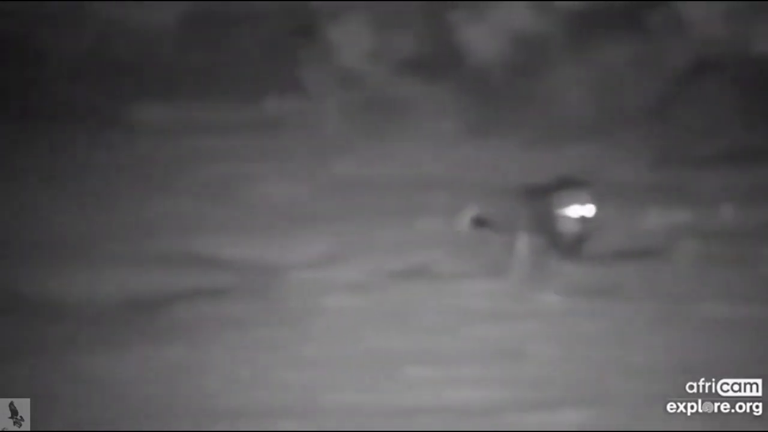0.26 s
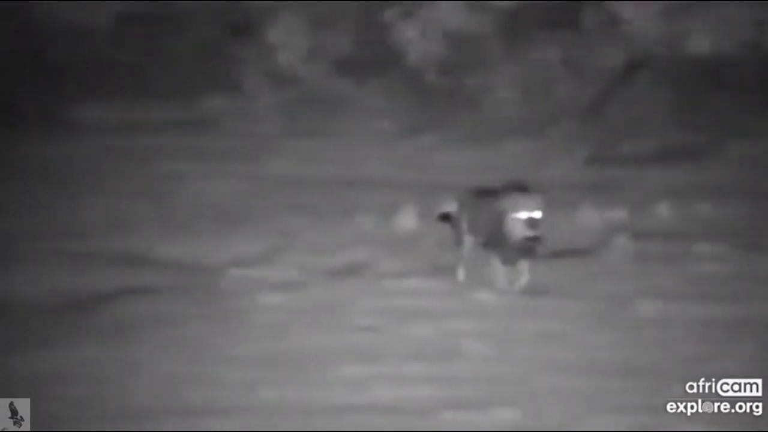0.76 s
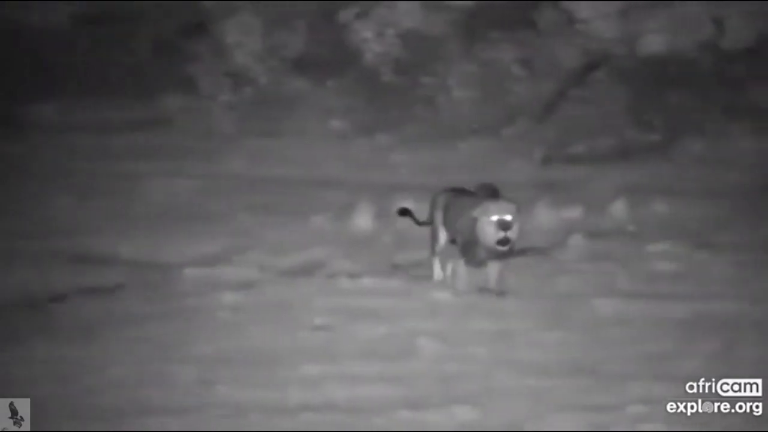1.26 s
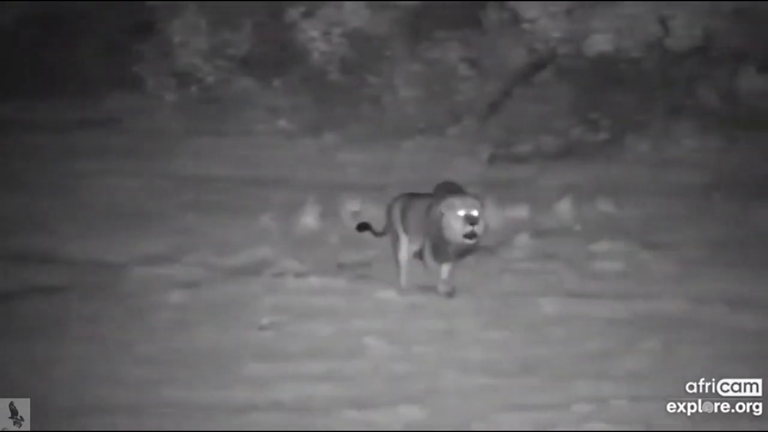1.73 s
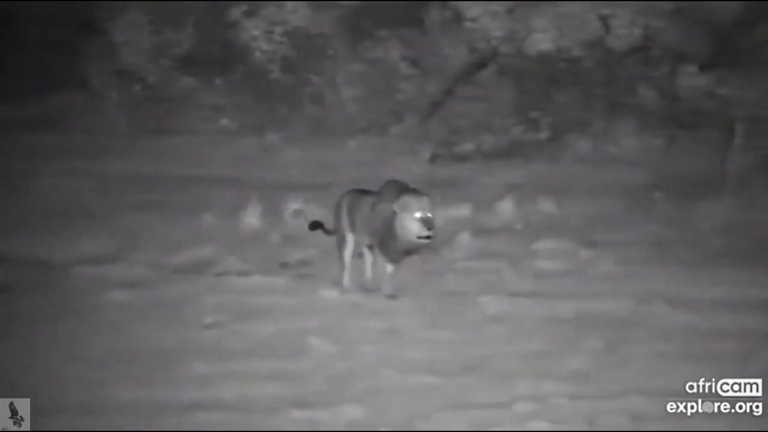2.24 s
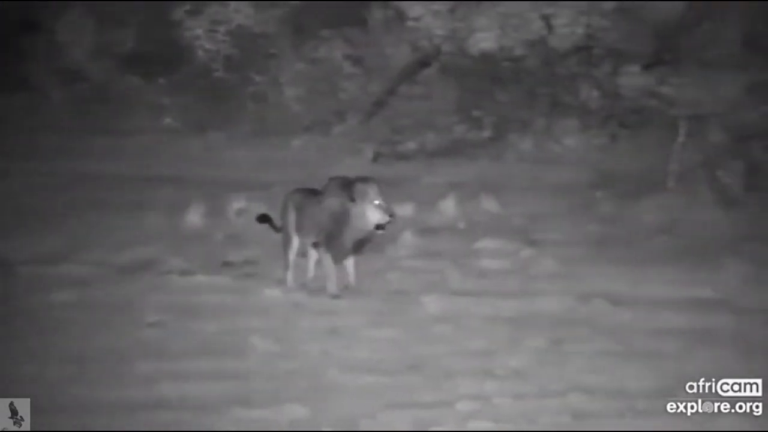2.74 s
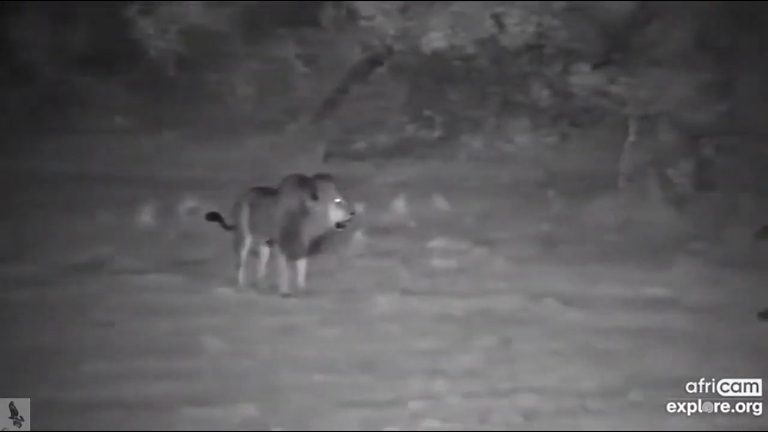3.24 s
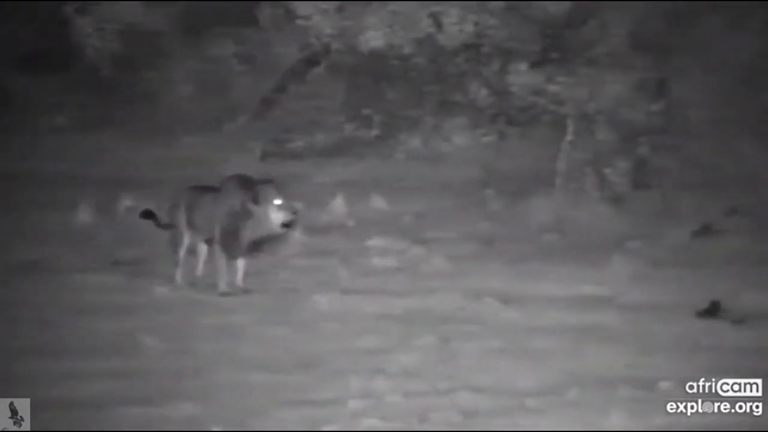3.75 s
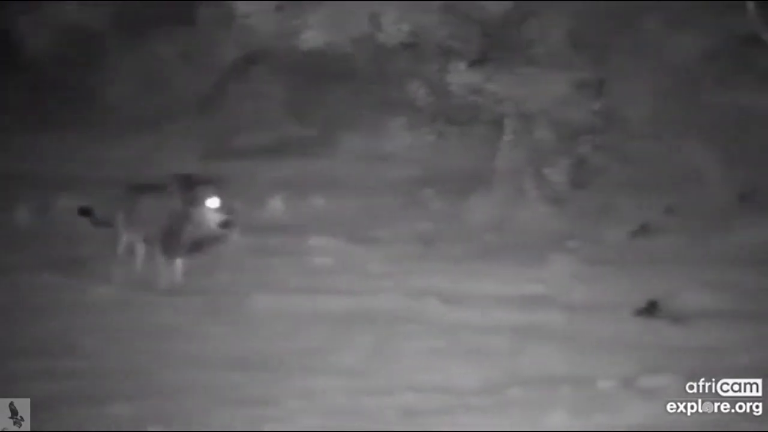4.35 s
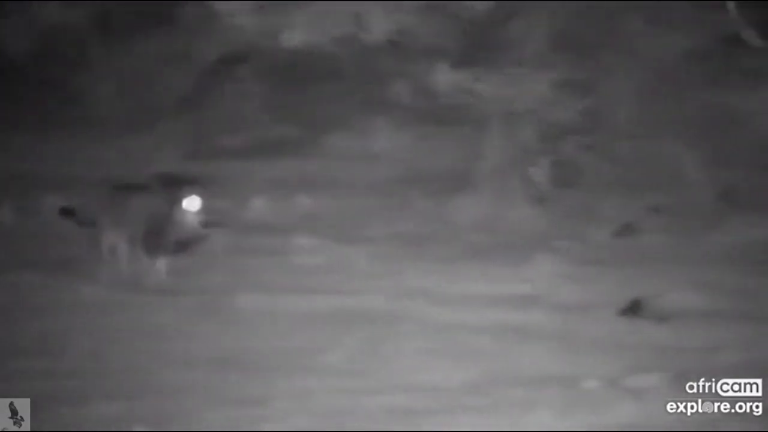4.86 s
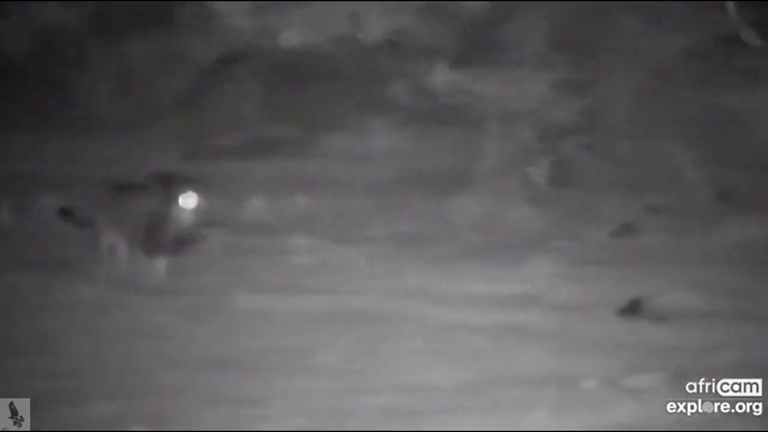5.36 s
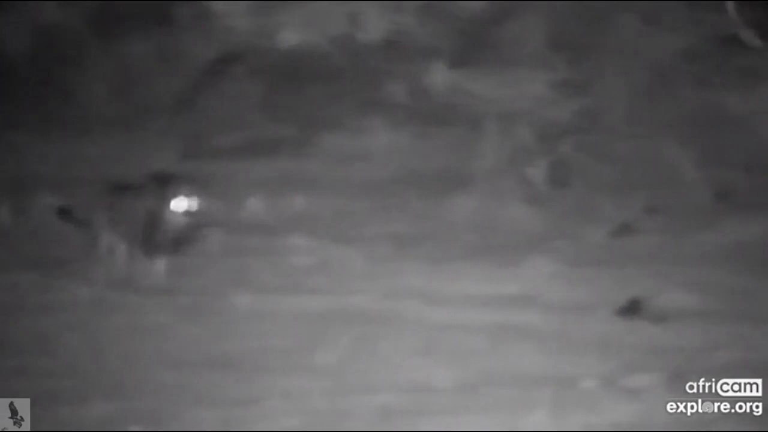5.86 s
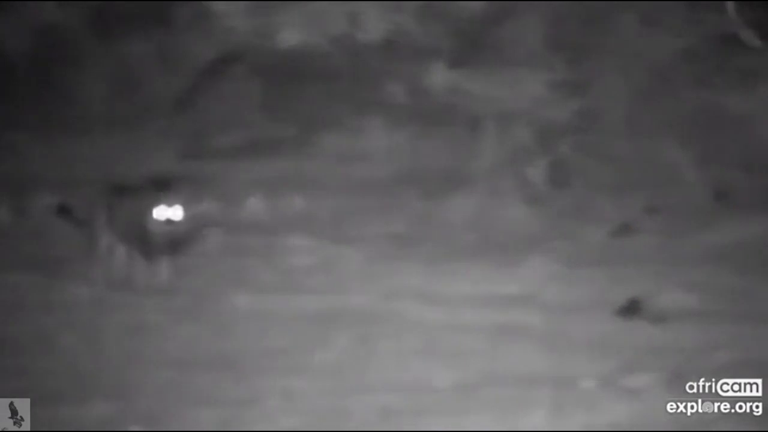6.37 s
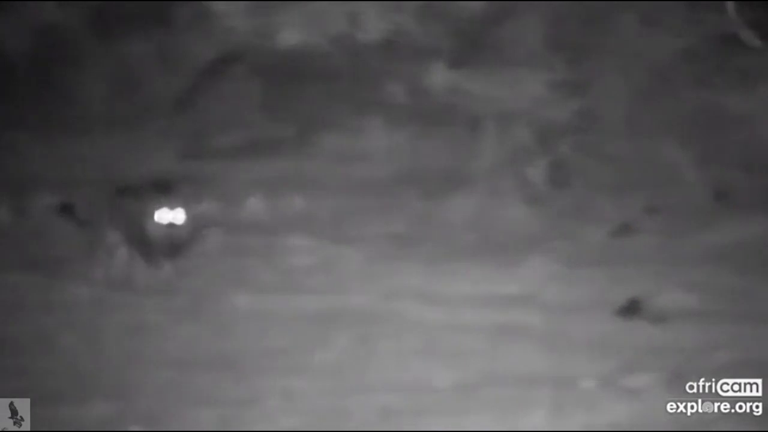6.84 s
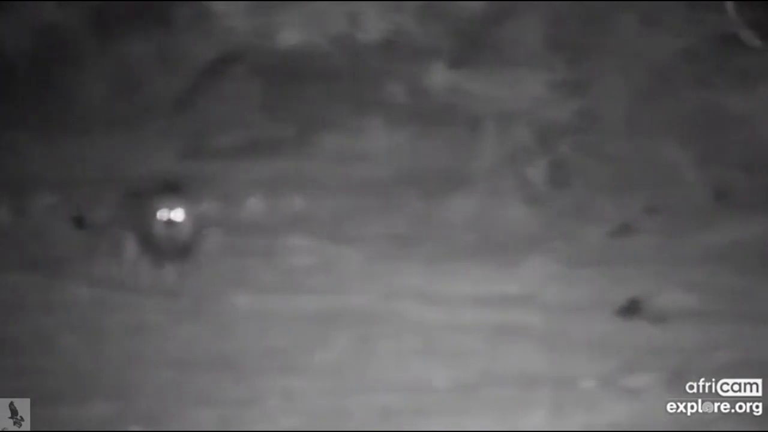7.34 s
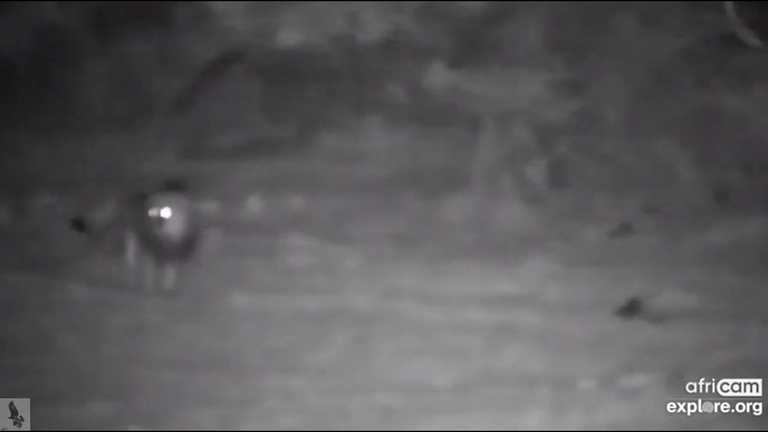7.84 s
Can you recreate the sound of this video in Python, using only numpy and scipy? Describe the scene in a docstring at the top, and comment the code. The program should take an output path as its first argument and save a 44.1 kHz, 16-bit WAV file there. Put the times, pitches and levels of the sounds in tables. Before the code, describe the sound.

A lion roars three times in open bush at night, some way from a fixed outdoor microphone. Each roar rises as a deep, clear moan, drops in pitch and crumbles into a ragged, breathy growl, then echoes off distant trees. Faint crickets chirp throughout. A small animal gives brief rising whistles around the first roar and a quick run near the end, over soft hiss and low electrical hum.

```python
"""Lion in the night bush

A lion roars three times in open bush, some way off from a fixed outdoor microphone. Each roar climbs
as a clear moan of the vocal folds, breaks to a lower pitch and crumbles into a growl of ragged pulses;
the far trees send it back. Crickets chirp, a small animal whistles now and then, and mains hum and
hiss lie under it all."""
import sys
import numpy as np
from scipy import signal
from scipy.fft import rfft, irfft
from scipy.io import wavfile
from scipy.ndimage import uniform_filter1d

SR = 44100
rng = np.random.default_rng(int(sys.argv[2]) if len(sys.argv) > 2 else 0)


def to_wav(s):
    """Save 16-bit WAV."""
    ch = np.atleast_2d(s).T  # columns
    pcm = np.round(np.clip(ch, -1, 1) * 32767)  # PCM
    wavfile.write(sys.argv[1], SR, pcm.astype(np.int16))


N = 357210

# The voice, one table a roar. Each row: time in seconds, effort in dB, pitch in Hz.
ROAR_CONTOURS = [
    [(1.28, -55.5, 119.9), (1.346, -31, 130.7), (1.468, -28, 184.9), (1.53, -22.5, 193.8),
     (1.61, -20, 194.2), (1.665, -18, 201.6), (1.825, -16.5, 213.8), (1.865, -20, 171.5),
     (1.925, -28, 161.6), (2.0, -21.5, 163.7), (2.1, -23, 165.4), (2.2, -24, 152.1), (2.4, -31.5, 140.3),
     (2.56, -50.5, 138.6)],
    [(4.02, -51, 120.6), (4.084, -33.5, 129.9), (4.182, -24, 184.1), (4.272, -21.5, 209.5),
     (4.46, -20, 215.1), (4.565, -22, 227.7), (4.62, -17.5, 208.2), (4.7, -22, 203.4), (4.73, -22.5, 163.5),
     (4.9, -24, 155.9), (4.97, -23.5, 184.9), (5.1, -28.5, 160.5), (5.17, -41.5, 161.5), (5.28, -53, 163.8)],
    [(6.53, -54, 117.6), (6.634, -29, 131.8), (6.77, -24, 165.6), (6.82, -23, 186.3), (7.02, -21, 193.9),
     (7.05, -24.5, 163.3), (7.13, -23, 158.5), (7.225, -14.5, 157.3), (7.3, -19.5, 153.1),
     (7.4, -23.5, 150), (7.54, -24, 153.4), (7.656, -35, 154.3), (7.78, -52, 149.4)],
]
# Each row, one a roar: seconds at which the moan starts, frays and breaks and the growl starts and
# is full, then roughness from 0 to 1 in the moan, once frayed and after the break.
ROAR_STAGES = [(1.48, 1.65, 1.85, 2.02, 2.11, .09, .23, .2), (4.265, 4.5, 4.575, 4.86, 5.0, .07, .1, .36),
               (6.8, 6.82, 7.06, 7.28, 7.39, .25, .28, .13)]
# Each row, one a roar: lip noise and overtone ring in dB against the effort, delay of the first rasp
# in seconds, deep throat gain in dB.
ROAR_TIMBRES = [(-19, -37, 0.11, 1.1), (-26.5, -22.5, 0.11, -0.4), (-22, -47, .17, -1.5)]
# Throbs of the voice. Each row: start in seconds, swell in dB, length in seconds.
THROBS = [(1.321, 4.5, 0.068), (2.207, 4, 0.028), (2.294, 7.5, 0.036), (2.375, 6, 0.04),
          (2.432, 9.5, 0.025), (4.046, 7.5, 0.036), (4.078, 11.5, 0.08), (5.008, 3.5, 0.02),
          (5.107, 4, 0.025), (6.56, 8.5, 0.015), (6.812, 10, 0.25), (6.632, 8.5, 0.0087), (7.434, 4, 0.029),
          (7.604, 6, 0.0062), (7.647, 0.5, 0.038), (7.723, 8.5, 0.013)]
# Throat resonances. Each row: centre in Hz, width in Hz, gain in dB.
DEEP_MODES = [(400, 120, 0), (320, 120, -8)]
MIDDLE_MODES = [(638, 95, 0)]
UPPER_MODES = [(942, 97, 3), (1112.4, 55, 1.5), (1308, 103, -1.5)]
# The moving throat, one table a roar. Each row: time in seconds, middle resonance in Hz, its gain
# in dB, lowest upper resonance in Hz, gain of the upper group in dB.
THROAT_SHAPES = [
    [(1.3, 580, -3, 840, 0.5), (1.5, 650, 4.5, 910, -6), (1.66, 637, -7.5, 934, -4),
     (1.7, 658, 9.5, 997, -6), (1.84, 634, 2.5, 980, -0.5), (1.9, 663, -8, 968, -4),
     (2.03, 640, -4, 925, 0), (2.1, 693, -14, 1013, -3.5), (2.25, 680, 2, 1033, 2.5),
     (2.45, 590, -15.5, 873, 0.5)],
    [(4.05, 586, 2.5, 903, -1.5), (4.26, 621, 2, 883, -3.5), (4.55, 638, 8, 920, 2), (4.68, 623, 5, 950, 1),
     (4.76, 586, -1, 875.2, -4.5), (4.88, 536, 12, 865, 6), (4.94, 750, 0, 985, -4.5),
     (5.05, 704, -4, 966, -2), (5.2, 620, -6, 902, -4)],
    [(6.55, 562, -14.5, 890, -7.5), (6.75, 635, 12.5, 877, 6.5), (6.85, 660, 2, 953, -2),
     (7.03, 673, 0.5, 970, -7.5), (7.25, 605, 14, 953, 12), (7.36, 614, -6.5, 947, -5),
     (7.42, 640, -0.5, 942, 1.5), (7.6, 596, -14, 903, 6), (7.75, 595, -22, 940, -5.5)],
]
# Breath, one table a roar. Each row: time in seconds, level in dB, mouth resonance in Hz, spread
# beside that resonance in dB, hiss over the teeth in dB against the level.
BREATH_CONTOURS = [
    [(1.28, -87, 3300, -11, -4), (1.37, -60, 3300, -7, -9), (1.45, -65, 3400, -18.5, -18),
     (1.76, -48.5, 3070, 2.5, -14.5), (1.9, -51.5, 3170, -3, -8), (2.096, -44, 3418, 0, -6),
     (2.402, -49.5, 2976, 6, -8), (2.56, -77, 3000, 0, -10)],
    [(4.02, -70.5, 2440, 2, 3), (4.22, -60.5, 2330, -7.5, -11.5), (4.436, -49, 2220, -17.5, -9.5),
     (4.62, -50.5, 2590, -3, -6), (4.8, -52, 3040, -1.5, -3.5), (5.0, -41.5, 2800, -2, -5.5),
     (5.28, -62, 2740, 0, -7)],
    [(6.53, -72, 2900, 3, -5.5), (6.692, -54, 3020, -1.5, -12.5), (6.78, -59.5, 2800, -5, -9),
     (6.95, -55.5, 2900, -5, -13), (7.32, -46.5, 3270, -9.5, -7.5), (7.532, -45, 3490, 5.5, -7.5),
     (7.78, -70.5, 3000, 11, -3)],
]
# Colour of the breath at mouth, lips and teeth. Each row: frequency in Hz, relative level in dB.
MOUTH_SPECTRUM = [(1800, -36.5), (2250, 6.5), (3700, 4.5), (4000, -1), (4600, -46.5)]
LIP_SPECTRUM = [(1300, 3), (1550, -8.5), (1740, 6.5), (1850, -6.5), (2000, 7.5), (2250, -15.5),
                (2700, -38.5)]
TEETH_SPECTRUM = [(3800, -10.5), (4350, -1.5), (5100, -4), (5700, -8), (6600, -12.5), (7500, -13.5),
                  (9000, -42.5), (11000, -83.5)]
# The chest's partial, one table a roar. Each row: time in seconds, pitch in Hz, level in dB.
CHEST_TONES = [
    [(1.3, 145, -68), (1.382, 140, -37.5), (1.492, 204.3, -39), (1.61, 187.5, -51.5), (1.686, 208.4, -35),
     (1.804, 209, -41.5), (1.836, 182.7, -45), (1.912, 166, -28.5), (2.118, 165.2, -33),
     (2.18, 161.6, -31.5), (2.266, 138, -54), (2.4, 106, -49), (2.52, 81.8, -67)],
    [(4.05, 138, -51), (4.098, 130.6, -47), (4.148, 154.4, -33), (4.258, 210, -44), (4.3, 209.8, -35.5),
     (4.582, 219.6, -51), (4.628, 183, -40), (4.77, 160.6, -27), (4.894, 154, -33), (4.96, 181, -42),
     (5.12, 125, -50), (5.22, 84, -56.5)],
    [(6.58, 119.6, -52), (6.61, 120, -55), (6.64, 137.4, -35), (6.73, 153, -35.5), (6.8, 180, -38),
     (6.906, 169.4, -50.5), (7.002, 178, -41.5), (7.098, 160.5, -31.5), (7.204, 156.8, -28.5),
     (7.43, 150, -32.5), (7.48, 145, -45), (7.6, 142.6, -54.5), (7.72, 89, -56)],
]
# Echo from the far trees. Each row: frequency in Hz, seconds to die away by 60 dB.
TREE_DECAY = [(150, 3.1), (400, 5), (1000, 3.26), (1600, 5.25), (4000, 2.26)]
# Each row, one a cricket: pitch in Hz, first beat in seconds, chirps a second, pulses a chirp,
# pulse length in seconds, fall in Hz, level in dB.
CRICKETS = [(2870, .04, 9.98, 1, .055, 480, -61), (2780, .02, 11.3, 1, .045, 380, -63),
            (2850, .01, 17, 1, .03, 350, -69), (4110, 2.52, 7.8, 2, .03, 300, -69)]
# Swell of the cricket chorus. Each row: time in seconds, gain in dB.
CRICKET_SWELL = [(0, -3.5), (1.2, -8), (2.5, -0.5), (3.1, -7.5), (3.45, 3), (3.9, -7), (5.3, -3.5),
                 (6.5, -3), (8.1, -9.5)]
# Each row, one a whistle: start in seconds, peak in dB, starting pitch in Hz, length in seconds.
WHISTLES = [(.87, -45, 1560, .07), (1.30, -44, 1560, .075), (6.615, -46, 1580, .045),
            (7.525, -50, 1580, .04), (7.645, -51, 1580, .04), (7.722, -51, 1580, .04),
            (7.80, -51, 1580, .04), (7.87, -53, 1580, .04), (.95, -65, 1100, .32), (7.955, -62, 10000, .04)]
# Odd multiples of the mains. Each row: frequency in Hz, rms level in dB.
MAINS_PARTIALS = [(50, -76), (150, -65), (250, -70), (350, -72.5), (450, -72.5), (550, -73)]
# Colour of the background hiss. Each row: frequency in Hz, relative level in dB.
NIGHT_SPECTRUM = [(12, -38), (20, -36), (95, -15.5), (149, -4), (200, -13.5), (634, -6), (785, -10.5),
                  (2840, -18.5), (12100, -22), (15700, -45), (22000, -120)]

TURN_S = .04  # the voice passes from one stage to the next


def lion(lead_s=2):
    """Roars from some way off, with the near ground's short ring and the far trees' long echo."""
    lead = lead_s * SR
    dry, noise = np.zeros(N + lead), rng.standard_normal(SR)
    for tables in zip(ROAR_CONTOURS, ROAR_STAGES, ROAR_TIMBRES, BREATH_CONTOURS, THROAT_SHAPES,
                      CHEST_TONES):
        start_s, sound = roar(*tables)
        add(dry, start_s + lead_s, sound)
    # A roar ends just before the start; only its echo is heard.
    add(dry, .7, gain_of(-22) * steadied(formants(noise, DEEP_MODES + MIDDLE_MODES + UPPER_MODES)))
    ground = gain_of(-15) * bush_echo(dry, [(200, .15), (3000, .063)], delay_s=.003865)
    trees = gain_of(-28.5) * bush_echo(dry, TREE_DECAY, delay_s=.046)
    return (dry + ground + trees)[lead:]


def roar(contour, stages, timbre, breath_rows, throat_rows, chest_rows):
    """Start time and sound of a roar: folds drive the throat, breath rasps above, chest hums below."""
    t = np.arange(contour[0][0], contour[-1][0], 1 / SR)
    effort_db, pitch_hz = follow(t, contour)
    moan_s, fray_s, break_s, growl_s, full_s, moan, frayed, broken = stages
    lip_db, ring_db, rasp_s, deep_db = timbre
    rough, = follow(t, [(moan_s - TURN_S / 2, .24), (moan_s + TURN_S / 2, moan), (fray_s, moan),
                        (fray_s + TURN_S, frayed), (break_s - TURN_S / 2, frayed),
                        (break_s + TURN_S / 2, broken), (growl_s, broken), (full_s, .95)])
    after_break = np.interp(t, [break_s, break_s + 2 * TURN_S], [0, 1])
    growl = np.interp(t, [growl_s, full_s], [0, 1])
    clear, ragged, airflow = vocal_folds(pitch_hz, rough)
    voice = throat(t, throat_rows, clear, ragged, rough, after_break, growl, deep_db)
    air = evened(airflow ** 1.1 * rng.standard_normal(len(t)))
    puffs = (.35 + 2 * rough + .5 * after_break) * air + .65 * (1 - rough) ** 2 * clear
    mouth = breath(t, breath_rows, air, puffs, rough, growl, rasp_s) / gain_of(effort_db)
    mouth += gain_of(lip_db) * steadied(coloured(puffs, LIP_SPECTRUM))
    ring_swell = np.interp(t, [moan_s - TURN_S, break_s], [.6, 1])
    mouth += gain_of(ring_db) * overtone_ring(clear, rough, ring_swell)
    # Air is pushed out in thuds under the pitch.
    thuds = gain_of(-37) * (.51 + rough) * evened(resonate_twice(np.gradient(ragged), 100, 80))
    throb = throbbing(t)
    sound = gain_of(effort_db) * (throb * voice + throb ** .8 * mouth + thuds)
    sound += chest(t, chest_rows, rough)
    return t[0], sound * signal.windows.tukey(len(t), .03)


def vocal_folds(pitch_hz, rough, jitter=.2, flutter_db=2.5):
    """Steady folds give clear harmonics; slack ones slap unevenly and slower, chopping the airflow."""
    n = len(rough)
    cycles = np.cumsum(pitch_hz * (1 + .003 * wander(n, 30))) / SR
    clear = evened(sum(np.cos(2 * np.pi * k * cycles) for k in range(2, 33)))
    slack_hz = pitch_hz * (1 - .58 * rough ** 6) * np.exp(jitter * rough * wander(n, 90.32))
    slack_cycles = np.cumsum(slack_hz) / SR
    flutter = gain_of(flutter_db * rough * wander(n, 45))  # loose tissue slaps at random
    airflow = (1.3 + np.exp(-(slack_cycles % 1))) * flutter
    slaps = np.diff(np.floor(slack_cycles), prepend=0) * flutter
    ragged = evened(evened(slaps) + .59 * evened(airflow * rng.standard_normal(n)))
    return clear, ragged, airflow


def throat(t, rows, clear, ragged, rough, after_break, growl, deep_db, deep_share=.6):
    """Clear and ragged pulses share the throat; the ragged meet wider middle and upper resonances."""
    middle_hz, middle_db, upper_hz, upper_db = follow(t, rows)
    # The deep throat lets through only a share of the roughness and fades in the growl.
    calm = np.sqrt(1 - deep_share * rough) * clear + 8.04 * deep_share * rough * ragged
    voice = formants(calm, [(hz, width, db + deep_db + break_db * after_break - 5 * growl)
                            for (hz, width, db), break_db in zip(DEEP_MODES, (-3.5, 4.5))])
    steady = np.sqrt(1 - rough) * clear
    slack = gain_of(-1) * 4.76 * rough ** .64 * ragged
    shift = 1 + .07 * rough ** 2 * wander(len(t), 10)  # the slack throat changes shape
    tilt_db = 16 * rough ** 6  # the growl gathers in the lowest upper resonance
    lowest_hz, middle_width = UPPER_MODES[0][0], MIDDLE_MODES[0][1]
    for drive, widen, trim_db in (steady, 1, 0), (slack, 1.5, -5 * (1 - growl)):
        upper = [(shift * (upper_hz if hz == lowest_hz else hz), width * widen,
                  db - tilt_db * (hz / lowest_hz - 1)) for hz, width, db in UPPER_MODES]
        voice -= formants(drive, [(middle_hz * shift, middle_width * widen, middle_db + trim_db)])
        voice += gain_of(upper_db) * formants(drive, upper)
    return steadied(voice)


def formants(drive, modes):
    """Steep throat resonances side by side, cut off below and above."""
    out = sum(gain_of(db) * resonate_twice(drive, hz, width) for hz, width, db in modes)
    return signal.sosfilt(signal.butter(4, [270, 1420], "bandpass", fs=SR, output="sos"), out)


def breath(t, rows, air, puffs, rough, growl, rasp_s):
    """Breath comes in patches through the mouth's resonance and hisses over the teeth."""
    level_db, mouth_hz, spread_db, teeth_db = follow(t, rows)
    level_db += 2.14 * wander(len(t), 13.8)
    mouth_hz *= 1 + .08 * rough * wander(len(t), 8)
    cavity = resonate_twice(puffs, mouth_hz, 650) + gain_of(spread_db) * puffs
    mouth = steadied(coloured(cavity, MOUTH_SPECTRUM))
    teeth_db += 14 * np.exp(-((t - t[0] - rasp_s) / .037) ** 2)  # a rasp as the voice sets in
    behind_teeth = gain_of(6) * resonate(puffs, hz=5200 - 450 * growl, width_hz=320)
    teeth = steadied(coloured(air + behind_teeth, TEETH_SPECTRUM))
    return gain_of(level_db) * (mouth + gain_of(teeth_db) * teeth)


def overtone_ring(clear, rough, swell, low_hz=2376, high_hz=6600):
    """Two resonances ring on the clear moan and fade as it roughens; the high one flickers."""
    low = swell * evened(resonate_twice(clear, low_hz, 110))
    high = gain_of(-31.5 + 4.28 * wander(len(clear), 20)) * evened(resonate_twice(clear, high_hz, 300))
    return (1 - rough) ** 3 * low + (1 - rough) ** 6 * high


def chest(t, rows, rough):
    """The lowest partial comes from the chest and shakes as the voice roughens."""
    hz, db = follow(t, rows)
    db += 4.5 * rough ** 2 * wander(len(t), 54)
    fade = np.interp(t, [t[0], rows[0][0], rows[-1][0], rows[-1][0] + 2 * TURN_S], [0, 1, 1, 0])
    return fade * gain_of(db) * np.sqrt(2) * np.cos(2 * np.pi * np.cumsum(hz) / SR)


def throbbing(t):
    """Gain of the voice's throbs: each swells at once, holds and drops."""
    swell_db = sum(db * np.clip((t - s) / .003, 0, 1) * np.exp(-(np.maximum(t - s, 0) / length) ** 3)
                   for s, db, length in THROBS)
    return steadied(gain_of(swell_db), size=6000)


def small_animals(whistle_rise=1.13):
    """A small animal's rising whistles join the crickets; both ring a little in the bush."""
    calls = crickets()
    for s, db, hz, length in WHISTLES:
        add(calls, s, gain_of(db) * sweep(hz, hz * whistle_rise, length, arch=.68))
    return calls + gain_of(-9) * bush_echo(calls, [(1500, .3), (2500, .5), (4000, .4)], delay_s=.01)


def crickets(pulse_gap_s=.036, spread_db=12):
    """Short chirps that fall in pitch, each a little late on its beat."""
    out = np.zeros(N)
    for hz, first_s, per_s, pulses, length, fall_hz, db in CRICKETS:
        beats = np.arange(first_s, N / SR, 1 / per_s)
        for s, (late, size, pitch) in zip(beats, rng.random((len(beats), 3))):
            top_hz = hz * (.98 + .04 * pitch) + fall_hz / 2
            level_db = db + follow(s, CRICKET_SWELL)[0] + spread_db * (size - .5)
            pulse = gain_of(level_db) * sweep(top_hz, top_hz - fall_hz, length, arch=.3)
            for k in range(pulses):
                add(out, s + .4 * late / per_s + k * pulse_gap_s, pulse)
    return out * (1 + .35 * wander(N, 150))  # the level flickers quickly


def bush_echo(x, decay, delay_s):
    """Sparse reflections of random sign. Each row of decay: frequency in Hz, seconds to fall 60 dB."""
    taps = np.zeros(3 * SR)
    slots = np.arange(round(delay_s * SR), len(taps) - 20, 20)
    taps[slots + rng.integers(0, 20, len(slots))] = rng.choice([-1., 1.], len(slots))
    hz, t, bands = signal.stft(taps, SR, nperseg=256)
    tail = signal.istft(bands * gain_of(-60 * t / at_hz(decay, hz)[:, None]), SR, nperseg=256)[1]
    return signal.fftconvolve(x, tail / np.linalg.norm(tail))[:len(x)]


def mains_hum():
    """Mains partials, wavering slightly in level."""
    t = np.arange(N) / SR
    return sum(np.sqrt(2) * gain_of(db + .6 * wander(N, 3.2))
               * np.sin(2 * np.pi * (hz * t + rng.random())) for hz, db in MAINS_PARTIALS)


def night_hiss(level_db=-61):
    """Hiss of air, far insects and the microphone, in faint drifting patches."""
    real, imag, patches = rng.standard_normal((N // 128 + 5, 257, 3)).T
    patches = evened(uniform_filter1d(uniform_filter1d(patches, size=24, axis=0), size=20, axis=1))
    hiss = signal.istft((real + 1j * imag) * gain_of(1.2 * patches), nperseg=512, noverlap=384)[1][:N]
    return gain_of(level_db) * evened(coloured(hiss, NIGHT_SPECTRUM))


def sweep(start_hz, end_hz, length_s, arch):
    """A soft-edged sine that glides along an arc; an arch over .5 turns back at the end."""
    progress = np.linspace(0, 1, round(length_s * SR))
    hz = start_hz + (end_hz - start_hz) * np.sin(np.pi * arch * progress)
    return np.sin(2 * np.pi * np.cumsum(hz) / SR) * np.sin(np.pi * progress)


def resonate(x, hz, width_hz):
    """A resonance of gain 1 that can move: shifts hz down to zero, smooths and shifts back."""
    carrier = np.exp(2j * np.pi * np.cumsum(hz * np.ones(len(x))) / SR)
    pole = np.exp(-np.pi * width_hz / SR)
    return 2 * (carrier * signal.lfilter([1 - pole], [1, -pole], x / carrier)).real


def resonate_twice(x, hz, width_hz):
    """A resonance with steeper sides."""
    return resonate(resonate(x, hz, width_hz), hz, width_hz)


def wander(n, hz):
    """Random curve of rms 1 that changes about hz times a second."""
    return evened(signal.sosfilt(signal.butter(2, hz, fs=SR, output="sos"), rng.standard_normal(n)))


def coloured(x, spectrum):
    """Filters by a spectrum table."""
    return irfft(rfft(x) * gain_of(at_hz(spectrum, np.fft.rfftfreq(len(x), 1 / SR))), len(x))


def at_hz(rows, hz):
    """Reads a table on a log-frequency axis."""
    row_hz, values = np.transpose(rows)
    return np.interp(np.log(hz + 1), np.log(row_hz + 1), values)


def follow(t, rows):
    """Reads a timed table at t, one curve for each column after the time."""
    times, *columns = np.transpose(rows)
    return [np.interp(t, times, column) for column in columns]


def gain_of(db):
    """Decibels to a factor."""
    return 10 ** (np.asarray(db) / 20)


def evened(x):
    """Scales to rms 1."""
    return x / np.sqrt(np.mean(x ** 2) + 1e-20)


def steadied(x, size=3000):
    """Holds the running rms at 1."""
    return x / np.sqrt(abs(uniform_filter1d(x ** 2, size=size)) + 1e-12)


def add(mix, start_s, sound):
    """Mixes a sound in."""
    part = mix[round(start_s * SR):][:len(sound)]
    part += sound[:len(part)]


def scene():
    """Everything reaches one fixed microphone in the open."""
    return (lion() + small_animals() + mains_hum() + night_hiss())[None]


def record(dry):
    """The microphone's signal is cut off steeply above about 12 kHz."""
    lowpass = signal.firwin(511, 12220, window=("kaiser", 9), fs=SR)
    return signal.oaconvolve(dry, lowpass[None], "same")


dry = scene()
out = record(dry)
to_wav(out)
```